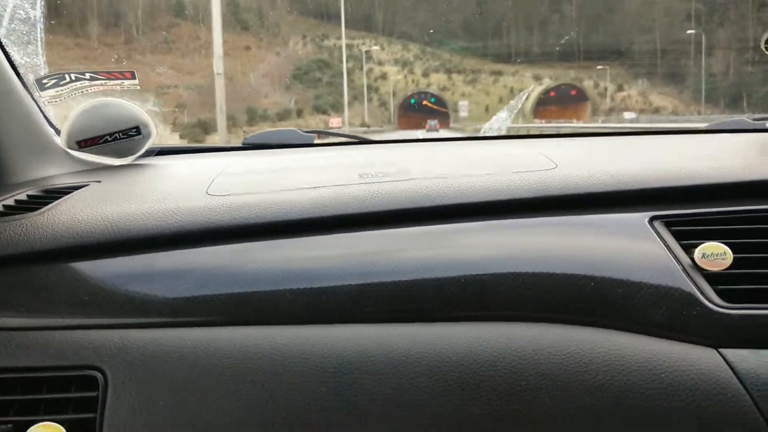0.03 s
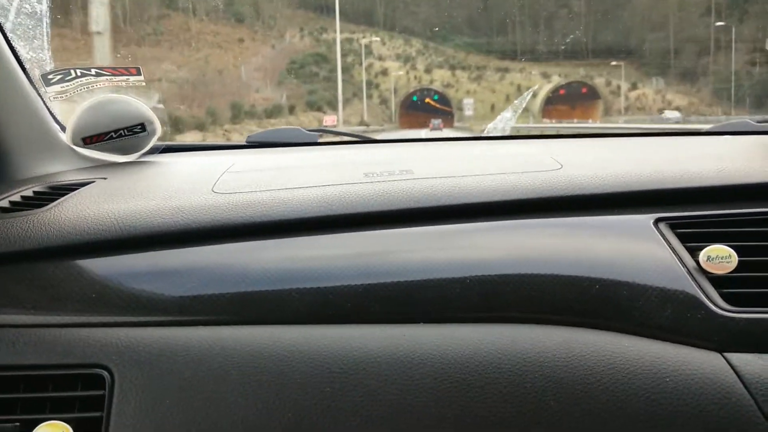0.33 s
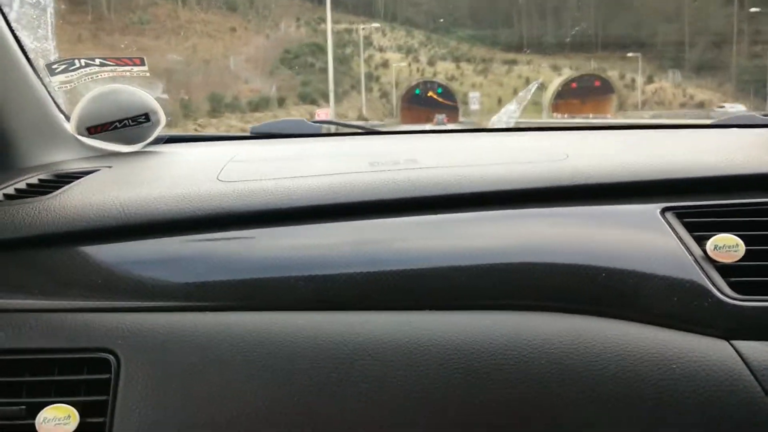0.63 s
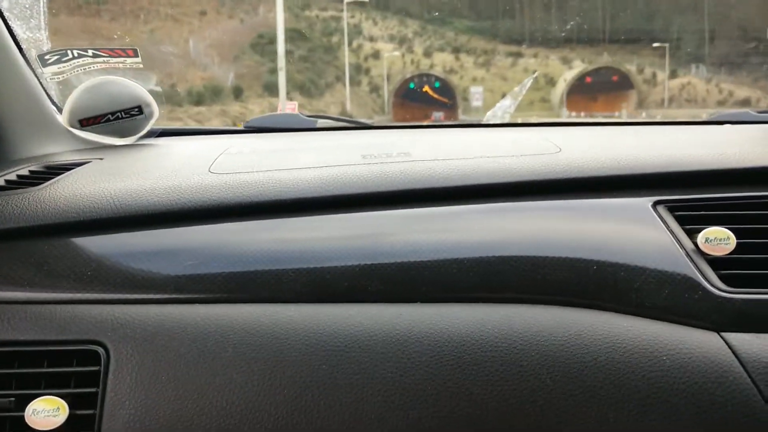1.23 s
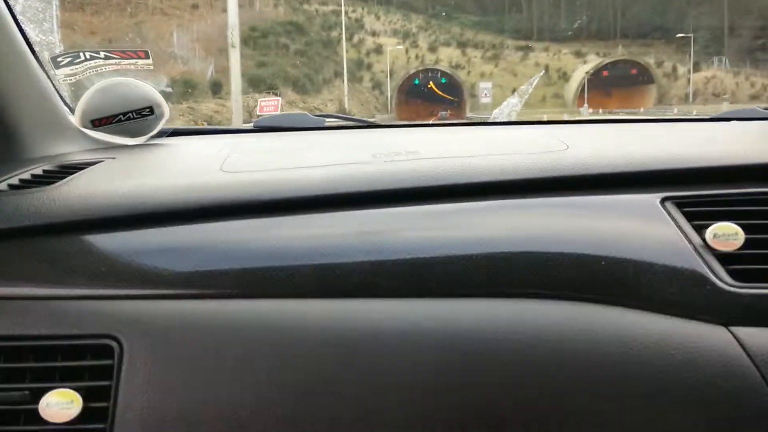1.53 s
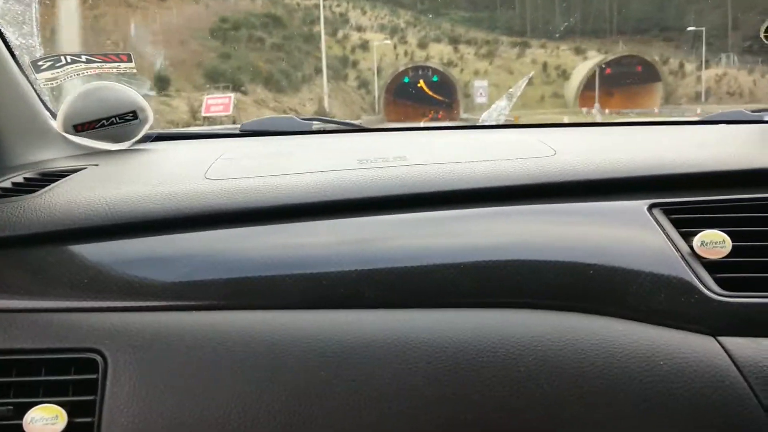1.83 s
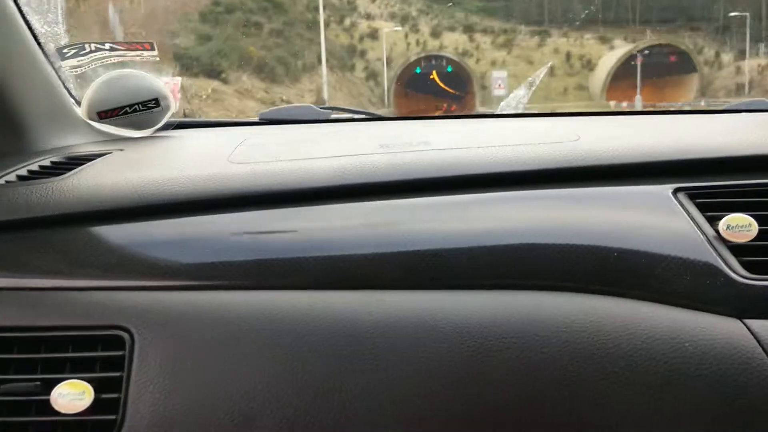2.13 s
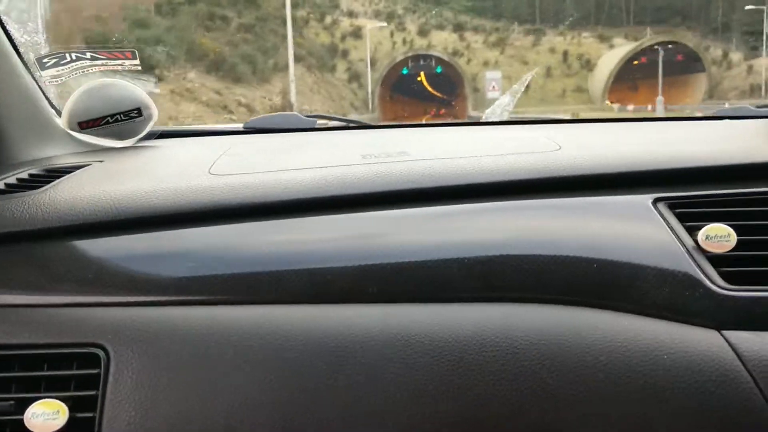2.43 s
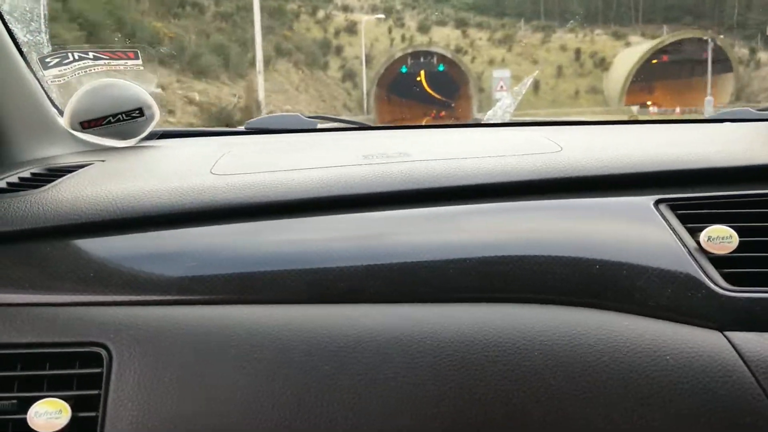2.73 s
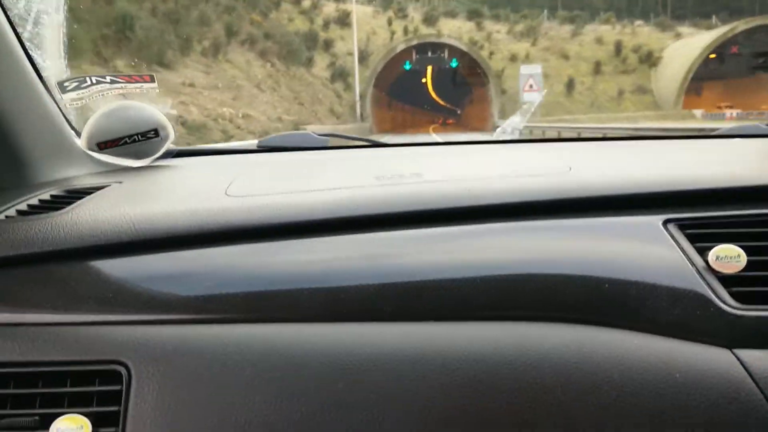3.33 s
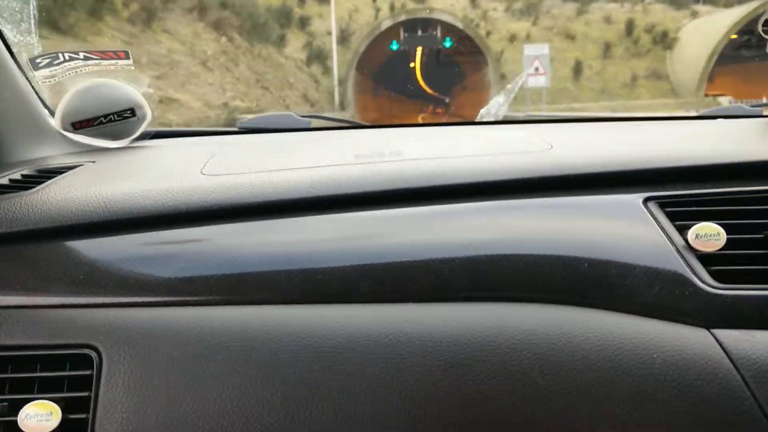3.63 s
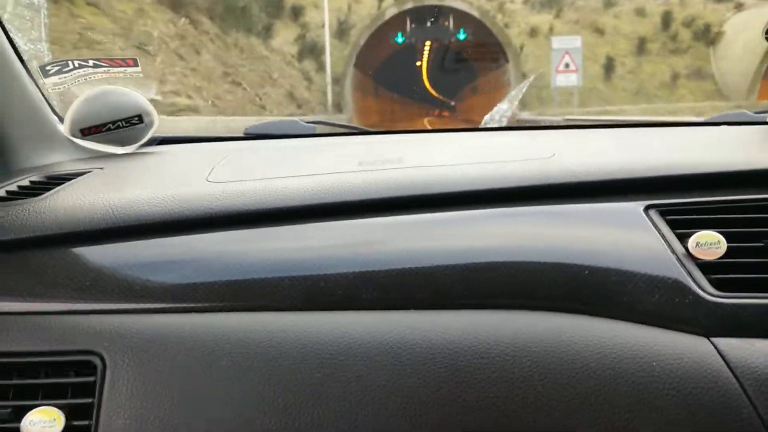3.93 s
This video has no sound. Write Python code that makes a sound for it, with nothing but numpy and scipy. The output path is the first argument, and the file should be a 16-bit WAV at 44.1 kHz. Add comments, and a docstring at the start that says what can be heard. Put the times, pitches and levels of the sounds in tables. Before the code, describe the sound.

A car engine drones low throughout the four seconds, heard inside the cabin, creeping up slightly in pitch and loudness over road rumble. The dashboard ticks and creaks lightly in the first half second. Soft, low bumps from the road come at about 0.7, 2.1 and 2.9 seconds. A rush of tyres and wind, with a faint hiss, gradually grows louder and brighter toward the end.

```python
"""A low exhaust boom fills the cabin of a four-cylinder car pulling steadily along a fast road.
Its tones are harmonics of the slowly rising firing rate. Around it lies broadband noise: road rumble
carried through the body, a swelling rush of tyres and wind, and the hiss of the intake.
The dashboard trim ticks by impact and creaks briefly by stick-slip friction, mostly at the start.
A faint high hiss swells around 0.4 s."""
import sys
import numpy as np
from scipy import signal
from scipy.fft import rfft, irfft
from scipy.io import wavfile

SR = 44100
rng = np.random.default_rng(int(sys.argv[2]) if len(sys.argv) > 2 else 0)


def wav_out(sig):
    """Save sig, one row per channel (or a flat mono array), as 16-bit PCM at SR to the path in sys.argv[1]."""
    wavfile.write(sys.argv[1], SR, np.round(np.clip(np.atleast_2d(sig).T, -1, 1) * 32767).astype(np.int16))


N = 176400
TIME = np.arange(N) / SR


def from_db(db):
    """Amplitude ratio of a level in decibels."""
    return 10 ** (np.asarray(db) / 20)


def rms_one(x):
    """Normalisation to unit rms."""
    return x / np.sqrt(np.mean(x ** 2) + 1e-20)


def in_time(rows):
    """Linear interpolation of each column at every sample."""
    times, *columns = np.transpose(rows)
    return [np.interp(TIME, times, column) for column in columns]


def swell(centre_s, half_s):
    """Gaussian envelope of height 1."""
    return np.exp(-((TIME - centre_s) / half_s) ** 2)


def drift(corner_hz):
    """Low-pass noise: a smooth random fluctuation of unit rms."""
    step, settle = 40, 2000
    pole = np.exp(-2 * np.pi * corner_hz * step / SR)
    noise = rng.standard_normal(N // step + settle + 2)
    slow = signal.lfilter([1], [1, -2 * pole, pole * pole], noise)[settle:]
    return np.interp(np.arange(N) / step, np.arange(len(slow)), rms_one(slow))


def coloured(x, spectrum, resonances=()):
    """Spectral shaping by an envelope and narrow resonance peaks; unit rms."""
    hz = np.arange(N // 2 + 1) * SR / N + 1
    points, db = np.transpose(spectrum)
    envelope_db = np.interp(np.log(hz), np.log(points), db)
    peaks_db = sum(boost / (1 + (2 * (hz - centre) / width) ** 2) for centre, width, boost in resonances)
    roll_off = np.minimum(hz / points[0], 1) ** 2 * np.minimum(points[-1] / hz, 1) ** 2
    return rms_one(irfft(rfft(x) * roll_off * from_db(envelope_db + peaks_db), N))


def resonate(x, hz, width_hz):
    """Damped resonator with unit peak gain."""
    r = np.exp(-np.pi * width_hz / SR)
    feedback = [1, -2 * r * np.cos(2 * np.pi * hz / SR), r * r]
    return signal.lfilter(np.array([1, 0, -1]) * (1 - r * r) / 2, feedback, x + 1e-18)


def ringing(hz, width_hz):
    """Random excitation of two resonators in series; unit rms."""
    return rms_one(resonate(resonate(rng.standard_normal(N), hz, width_hz), hz, width_hz))


# Engine speed: (time [s], firing rate [Hz])
FIRING_RATE = [(0, 97), (.35, 97), (1.15, 98.1), (1.45, 98.75), (2.8, 100.3), (3.35, 101.1), (4, 102.6)]
def firing_phase():
    """Phase is the time integral of frequency: one turn per firing."""
    return 2 * np.pi * np.cumsum(in_time(FIRING_RATE)[0]) / SR + np.pi / 2


# Cabin boom: (time [s], level [dB] of each of harmonics 1 to 4)
HARMONIC_LEVELS = [(0, -9.3, -27.5, -32.4, -38), (0.18, -8.9, -31.1, -35.3, -36.4),
                   (0.33, -9.0, -22.5, -36.6, -37.0), (0.5, -9.2, -22.9, -33.3, -36.5),
                   (0.7, -8.9, -17.2, -33.6, -35.9), (1, -9.1, -18.6, -32.2, -36.3),
                   (1.25, -8.3, -14.2, -33.8, -38.6), (1.6, -8.6, -16.6, -36.4, -33.8),
                   (1.79, -9.2, -20.9, -38.6, -36.5), (1.9, -8.5, -13.3, -30.4, -38.3),
                   (2.05, -8.0, -15.0, -34.6, -35.5), (2.35, -7.5, -14.6, -30.4, -35.7),
                   (2.65, -7.5, -16.5, -27.4, -35.0), (3, -7.2, -18.2, -27.6, -40.9),
                   (3.35, -7.0, -19.5, -27, -42), (3.6, -6.9, -22.0, -25.7, -39),
                   (3.8, -6.9, -18.2, -31.2, -35.2), (4, -6.9, -20.6, -25.1, -35.5)]
# Unsteadiness of each of those harmonics: (flutter [ratio])
HARMONIC_FLUTTER = [.02, .08, .11, .15]
# Weaker tones: (multiple of the firing rate [ratio], mid-scene level [dB], flutter [ratio])
SIDE_TONES = [(.75, -38.5, .8), (1.25, -34, 0.71), (1.5, -35, 0.71), (1.75, -27.5, 0.17), (2.5, -42, 0.26),
              (5, -49.5, 0.42)]
def exhaust_boom(firing):
    """Periodic firing gives a harmonic series; unequal cylinders add most of the weaker tones."""
    def tone(multiple, db, flutter):
        in_phase = (1 + flutter * drift(7.4)) * np.cos(multiple * firing)
        quadrature = flutter * drift(11.0) * np.sin(multiple * firing)
        return np.sqrt(2) * from_db(db) * (in_phase + quadrature)
    boom = sum(tone(k + 1, db, HARMONIC_FLUTTER[k]) for k, db in enumerate(in_time(HARMONIC_LEVELS)))
    growth_db = 0.4 * (TIME - TIME.mean())   # the engine pulls harder
    return boom + sum(tone(multiple, db + growth_db, flutter) for multiple, db, flutter in SIDE_TONES)


# Rumble spectrum: (frequency [Hz], relative density [dB])
RUMBLE_SPECTRUM = [(20, -39), (30, -18.5), (40, -12), (60, 2.5), (80, -3.5), (110, -4), (150, -5.5),
                   (205, -8), (260, -19), (330, -24), (450, -22), (550, -32.5), (800, -43)]
# Rumble envelope: (time [s], level [dB])
RUMBLE_LEVEL = [(0, -22), (.8, -23.5), (2.85, -22), (4, -23.5)]
# Uneven patches of road: (centre time [s], half length [s], level [dB], frequency [Hz])
ROAD_BUMPS = [(.06, 0.062, -29, 54), (0.688, .06, -18.5, 60), (2.1, 0.053, -17, 66.5),
              (2.85, .07, -21, 61.7), (3.41, 0.033, -24.5, 302)]
def road_rumble():
    """Forced vibration: the road shakes the body, which surges over uneven patches."""
    bumps = sum(from_db(db) * swell(s, half) * ringing(hz, hz / 2) for s, half, db, hz in ROAD_BUMPS)
    rumble = coloured(rng.standard_normal(N), RUMBLE_SPECTRUM)
    return from_db(in_time(RUMBLE_LEVEL)[0]) * rumble + bumps


# Tyre and wind spectrum: (frequency [Hz], relative density [dB])
RUSH_SPECTRUM = [(300, 1), (420, 2.5), (490, 0.5), (545, -5), (620, 0.5), (900, -4), (1030, -4), (1350, -5),
                 (1700, -6.5), (1950, -9), (2300, -10.5), (2650, -13), (2950, -18.5), (3500, -17.5),
                 (5000, -26), (8000, -44.5), (15000, -50)]
# Rush envelope before flicker and brightening: (time [s], level [dB])
RUSH_ENVELOPE = [(0, -37.5), (.7, -34), (1.6, -32), (2.3, -29.5), (3.1, -29), (3.8, -27.5), (4, -28)]
# Cabin resonances: (frequency [Hz], bandwidth [Hz], boost [dB])
CABIN_MODES = [(722, 29, 4), (781, 24, 5), (955, 50, 2), (1093, 31, 4), (1246, 42, 3.5), (1542, 57, 3.5)]
def tyre_and_wind_rush():
    """Broadband tyre and wind noise excites the cabin's modes as it swells and brightens."""
    air = coloured(rng.standard_normal(N), RUSH_SPECTRUM, CABIN_MODES) * from_db(0.84 * drift(25))
    dull = signal.sosfilt(signal.butter(1, 1300, fs=SR, output="sos"), air)
    treble = (air - dull) * from_db(1.05 * (TIME - TIME.mean()))   # gains 1.05 dB per second
    return from_db(in_time(RUSH_ENVELOPE)[0]) * (dull + treble)


# Tread envelope: (time [s], level [dB])
TREAD_ENVELOPE = [(0, -52), (.75, -40.5), (1.3, -45), (1.75, -37.5), (1.92, -45.5), (3, -50.5), (3.17, -40),
                  (3.85, -37.5)]
def tread_song():
    """Resonance of the tyre tread: a narrow band of noise that comes and goes with the surface."""
    return from_db(in_time(TREAD_ENVELOPE)[0]) * ringing(hz=898, width_hz=120)


# Intake spectrum: (frequency [Hz], relative density [dB])
HISS_SPECTRUM = [(1500, -5), (3000, -2.5), (3600, -0.5), (4700, 2), (5450, 1.5), (6200, -5), (7000, -11),
                 (8500, -17.5), (10300, -20.5), (13000, -25), (15500, -22.5)]
# Intake envelope: (time [s], level [dB])
HISS_ENVELOPE = [(0, -55), (.07, -50), (.085, -37.5), (.16, -43), (.215, -45.5), (.27, -37), (.4, -42),
                 (.8, -41), (1.8, -40.5), (2.35, -37), (2.62, -40), (2.85, -38), (3.25, -36), (3.45, -36),
                 (3.7, -36.5), (4, -31.5)]
# Brief flares of the hiss: (centre time [s], half length [s], boost [dB])
HISS_FLARES = [(2.926, 0.011, 5.5), (3.038, 0.018, 3), (3.149, 0.011, 4.5), (3.318, 0.016, 6.5)]
def intake_hiss(firing):
    """Flow noise of air drawn into the engine, slightly amplitude-modulated by each stroke."""
    hiss = coloured(rng.standard_normal(N), HISS_SPECTRUM)
    flare_db = sum(boost * swell(s, half) for s, half, boost in HISS_FLARES)
    flicker_db = 1.03 * drift(32)
    pulsing = 1 + 0.095 * np.cos(firing)
    return from_db(in_time(HISS_ENVELOPE)[0] + flare_db + flicker_db) * pulsing * hiss


# Trim impacts: (time [s], relative level [dB], frequency [Hz], 60 dB decay time [s], crack [ratio])
TRIM_IMPACTS = [(.0732, -18.5, 4100, .04, .3), (.1115, -24, 5400, .1, .4), (.121, -25, 1350, .06, .01),
                (.124, -21.5, 2050, .05, .01), (.241, -24.5, 2000, .03, .15),
                (.2653, -15.5, 4800, .04, .75), (.4685, -19.5, 4800, .022, .15),
                (1.9565, -27, 10000, .012, .15), (2.204, -37, 9000, .025, .1), (2.3, -41, 11000, .025, .2),
                (3.039, -34, 7700, .03, .1), (3.692, -33.5, 14500, .02, .1)]
def trim_ticks(crack_t60_s=.022):
    """Impact excitation: plastic parts snap together with a broadband crack and a damped ring."""
    out = np.zeros(N)
    for s, db, hz, t60, share in TRIM_IMPACTS:
        age = np.maximum(TIME - s, 0)
        crack = share * rng.standard_normal(N) * from_db(-60 * age / crack_t60_s)
        ring = ringing(hz, width_hz=.35 * hz) * from_db(-60 * age / t60)
        out += (TIME >= s) * from_db(db) * (ring + crack) / 2
    return out


# Four short creaks, then a faint high hiss: (centre time [s], half length [s], level [dB])
CREAK_AND_HISS_SWELLS = [(.107, .008, -32), (.226, .003, -37), (.249, .011, -32.5), (.27, .008, -35),
                         (.42, .2, -47)]
# Spectrum of both: (frequency [Hz], relative density [dB])
CLICK_SPECTRUM = [(900, -12), (2200, -1.5), (3000, 4.5), (5500, 3), (7500, -7), (10000, -7.5),
                  (15500, -20.5)]
def creaks_and_faint_hiss(clicks_per_s=5000):
    """Stick-slip friction creaks in the flexing dashboard; a faint high hiss also swells near 0.4 s."""
    envelope = sum(from_db(db) * swell(s, half) for s, half, db in CREAK_AND_HISS_SWELLS)
    clicks = (rng.random(N) < clicks_per_s / SR) * rng.standard_normal(N)
    return envelope * coloured(clicks, CLICK_SPECTRUM)


def scene():
    """Superposition of all sources at the passenger seat, in mono."""
    firing = firing_phase()
    driving = exhaust_boom(firing) + road_rumble() + tyre_and_wind_rush() + tread_song()
    return (driving + intake_hiss(firing) + trim_ticks() + creaks_and_faint_hiss())[None]


def record(dry, low_cut_hz=34.5, ceiling=1.02, high_cut_hz=15800):
    """Band limiting and saturation: the microphone sheds deep bass, rounds peaks and cuts the top."""
    x = signal.sosfilt(signal.butter(2, low_cut_hz, "high", fs=SR, output="sos"), dry)
    x = x / (1 + (x / ceiling) ** 12) ** (1 / 12)
    return signal.sosfilt(signal.ellip(10, .1, 80, high_cut_hz, fs=SR, output="sos"), x)


dry = scene()
out = record(dry)
wav_out(out)
```